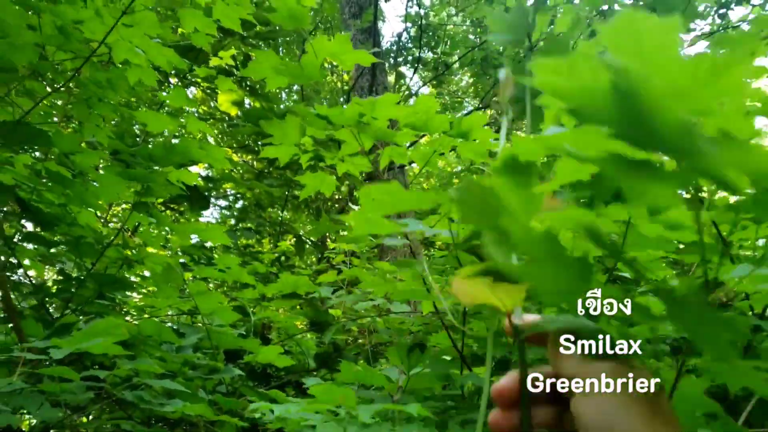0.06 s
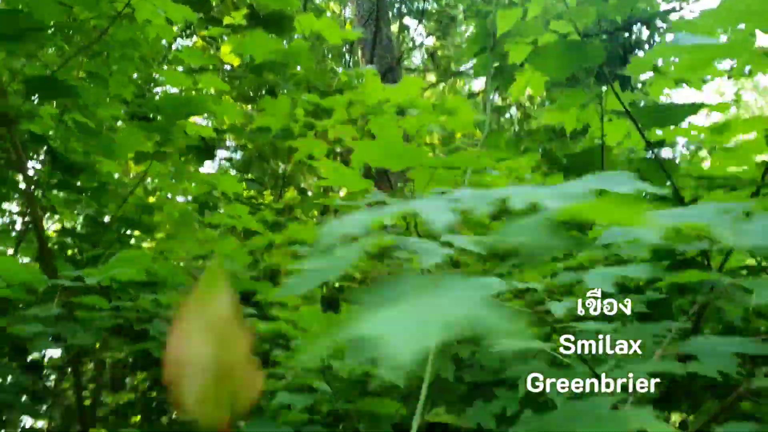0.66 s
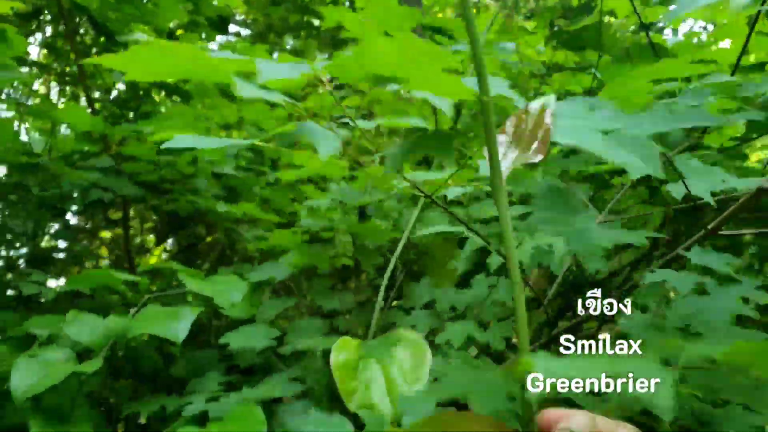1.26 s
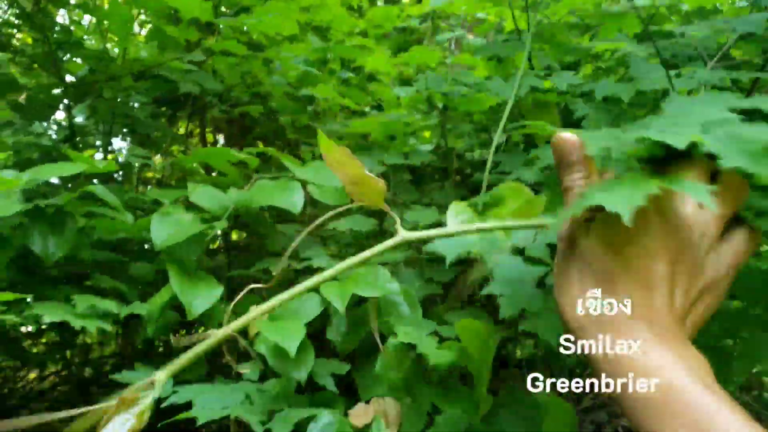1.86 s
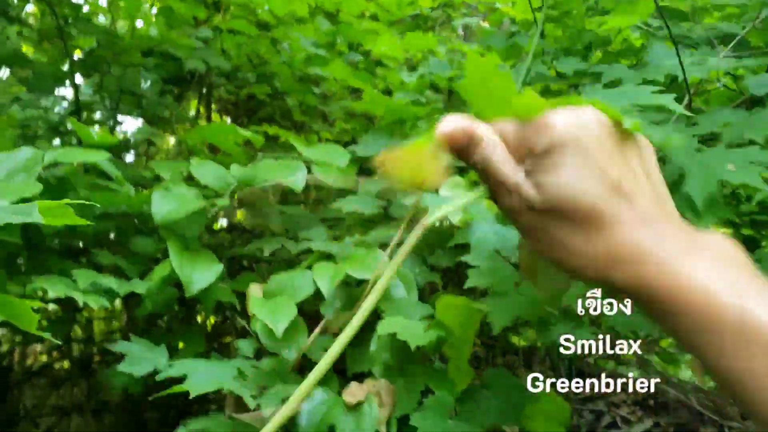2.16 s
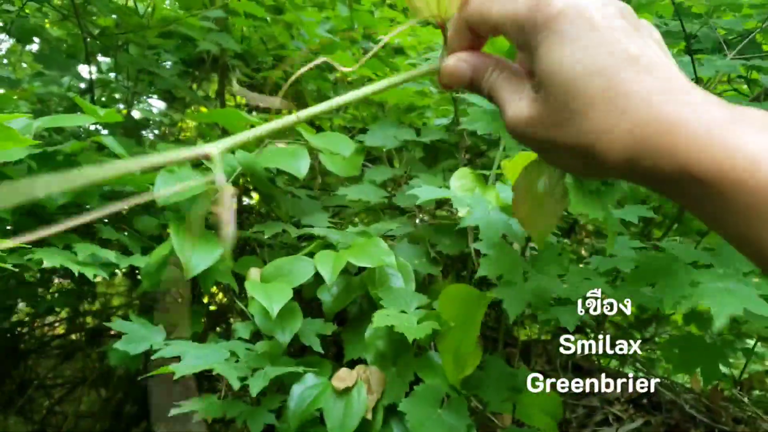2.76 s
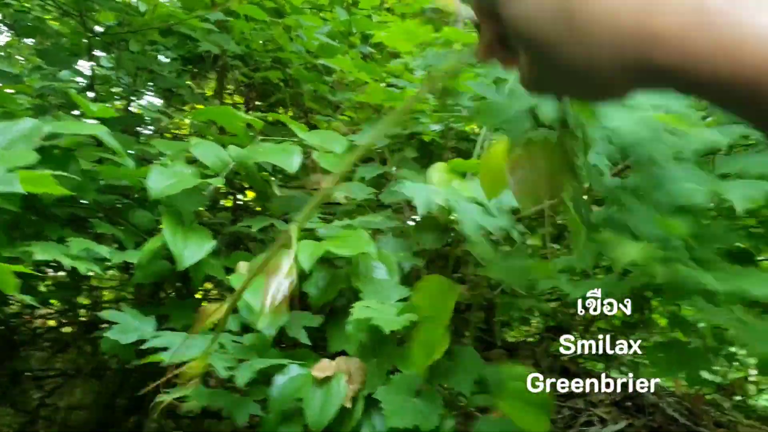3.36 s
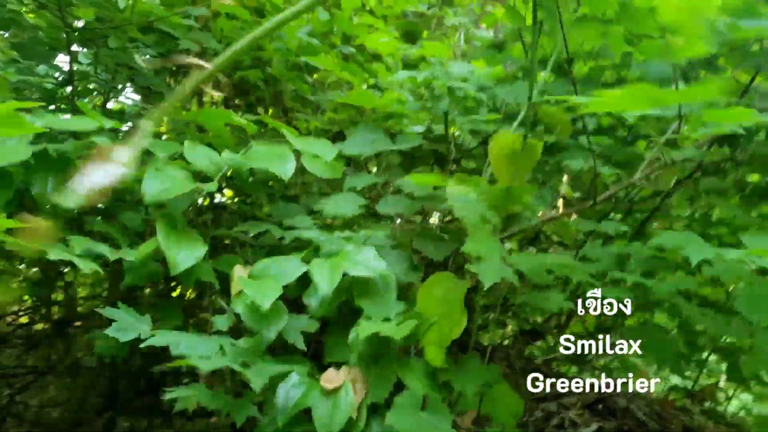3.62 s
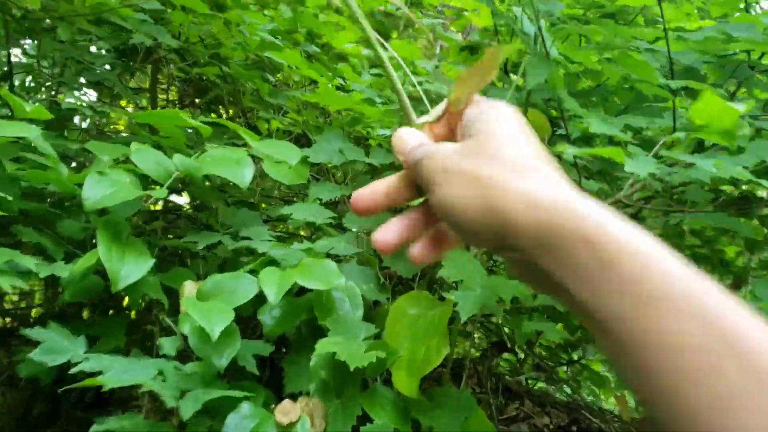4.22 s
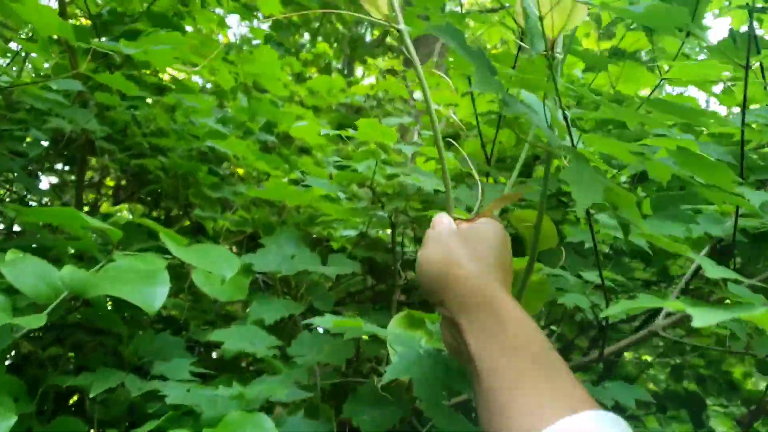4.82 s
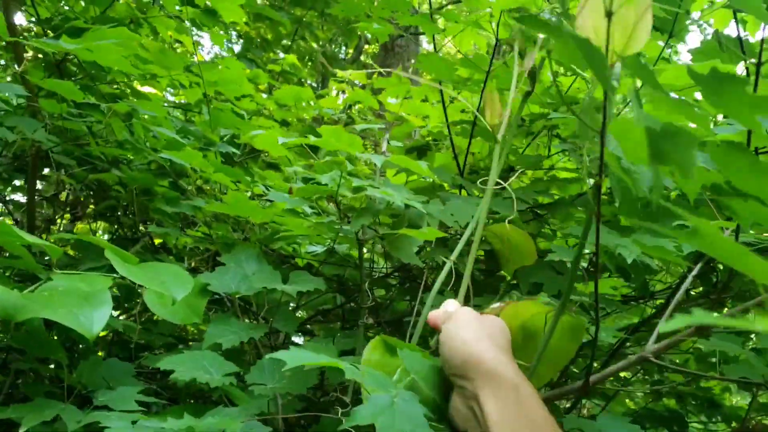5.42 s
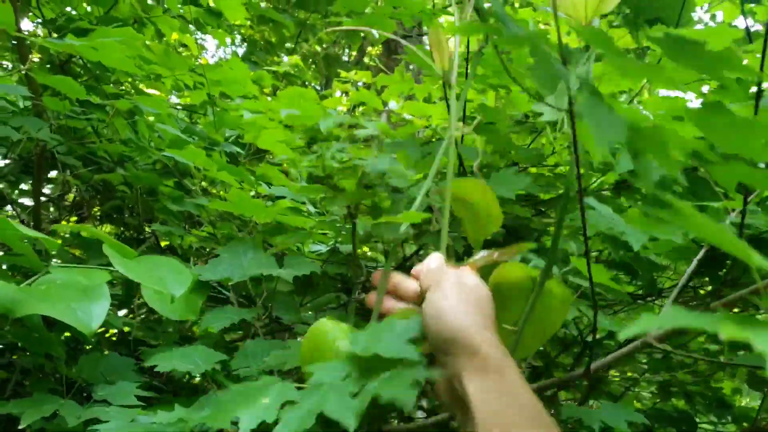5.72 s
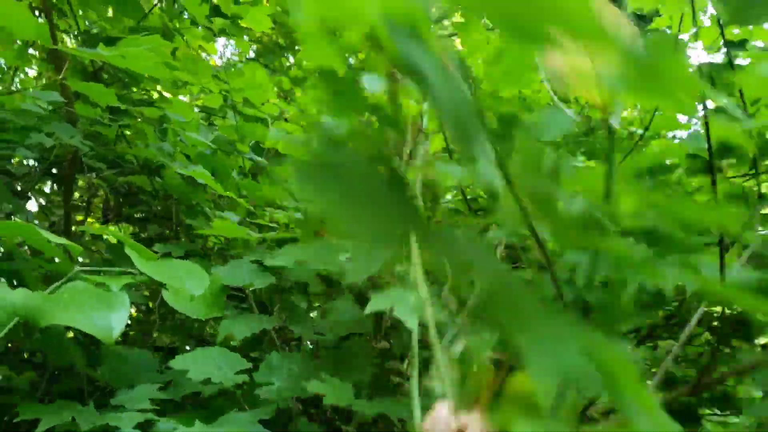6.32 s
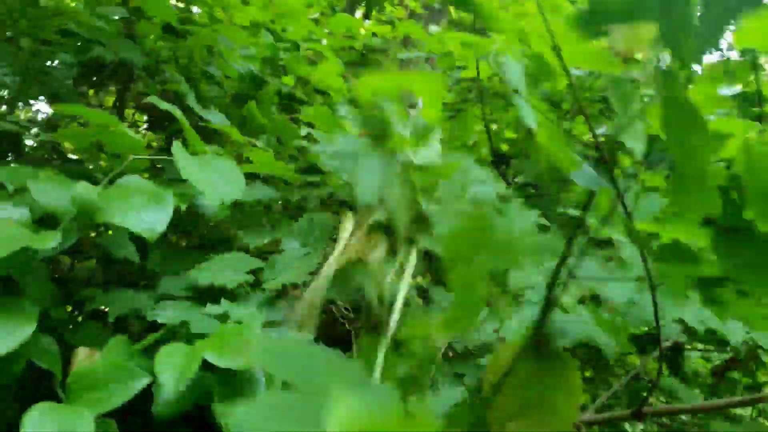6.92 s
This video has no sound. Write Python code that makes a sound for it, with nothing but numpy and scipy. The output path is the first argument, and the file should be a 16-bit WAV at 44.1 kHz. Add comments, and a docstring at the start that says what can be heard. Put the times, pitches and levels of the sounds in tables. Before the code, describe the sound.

Leaves rustle and brush a hand-held microphone as a vine is tugged through forest undergrowth, with a few sharp stem clicks. The rustling eases while a hawk-like bird repeats a hoarse, falling scream farther off, six times in all, with a short woodland echo. Near the end comes a loud flurry of leaf swipes, snaps and taps, over faint outdoor air and an uneven low rumble.

```python
"""A hawk-like bird, a little left of centre in leafy woodland, ends one call and screams six more "kee-aah"s:
each whistle scoops up, breaks to a lower register and trails off among the far trunks.
Close to the microphone a hand pulls a vine through the undergrowth: leaves rustle, stems snap,
and foliage swipes and taps the hand-held camera. Under it all lie soft air and a low handling rumble."""
import sys
import numpy as np
from scipy import signal
from scipy.fft import rfft, irfft, next_fast_len
from scipy.io import wavfile

SR = 44100
rng = np.random.default_rng(int(sys.argv[2]) if len(sys.argv) > 2 else 0)


def dump(signal):
    """Clip the signal to [-1, 1] and save it as 16-bit WAV at the path in sys.argv[1]."""
    limited = np.clip(np.atleast_2d(signal).T, -1, 1)
    pcm = np.round(limited * 32767).astype(np.int16)
    wavfile.write(sys.argv[1], SR, pcm)


N = 312228

# Likeness of the two microphone channels. Each row: frequency in Hz, correlation.
CHANNEL_LIKENESS = [(60, 1), (130, 0.95), (290, 0.75), (640, 0.54), (1400, 0.38), (3100, 0.16),
                    (6800, 0.034), (15000, .05)]
# Balance of the microphone ports. Each row: frequency in Hz, left minus right in dB.
PORT_BALANCE = [(900, -3), (2400, 3.5), (4400, -6), (8000, 2), (10500, -7.5), (13000, -15)]
# Reverberation from the far trunks. Each row: frequency in Hz, seconds to fall by 60 dB.
FOREST_T60 = [(500, 0.32), (1300, 0.82), (2400, 1.24), (5000, 0.2)]
# Course of the handling rumble. Each row: time in seconds, level in dB.
RUMBLE_LEVELS = [(0.0, -46), (0.39, -42.5), (0.71, -47.5), (0.75, -40.5), (1.14, -65.5), (2.34, -57.5),
                 (2.42, -60), (3.04, -54.5), (3.06, -57), (3.77, -46.5), (3.98, -59), (4.06, -49.5),
                 (4.2, -53), (4.43, -48.5), (6.62, -47.5), (6.76, -40), (7.02, -55.5), (7.08, -47)]

# The colour of each noise. Each row: frequency in Hz, relative spectral density in dB.
RUMBLE_SPECTRUM = [(20, -24), (35, -16), (50, -4.5), (68, 1), (85, -5), (105, -9.5), (170, -17.5),
                   (270, -19.5), (400, -33), (800, -74)]
AIR_SPECTRUM = [(25, -36), (100, 6.5), (350, 1.5), (600, -0.5), (1200, -1.5), (2400, -3), (4000, -3.5),
                (9000, -21)]  # also colours the dull rubbing of leaves
HISS_SPECTRUM = [(3000, -22.5), (7000, -14.5), (8200, -24), (9500, -3.5), (10800, 1), (11800, -0.5),
                 (13000, -9), (15500, -12)]
CRINKLE_SPECTRUM = [(500, -10.5), (1300, -7.5), (2100, 1.5), (3100, 6.5), (3500, -5.5), (3900, -3.5),
                    (4600, 2.5), (6000, -4.5), (7300, -2.5), (8200, -30), (12000, -20)]
SWISH_SPECTRUM = [(600, -15.5), (1300, -17), (1800, -6.5), (2300, -0.5), (3100, -2), (3600, -8),
                  (4600, -6.5), (7000, -12), (9000, -27)]
SWIPE_SPECTRUM = [(25, -39), (100, -5.5), (400, -1), (650, -4), (1000, -2), (2500, 1.5), (3800, -1),
                  (7000, -6.5), (8200, -11), (9500, -1), (11000, 2.5), (13000, -8.5), (15500, -12)]
KNOCK_SPECTRUM = [(25, -44), (100, -7.5), (600, -10), (1200, -4), (2000, -2.5), (2900, 0), (4200, -9.5),
                  (5200, -11.5), (6500, -49), (12000, -30)]
TICK_SPECTRUM = [(25, -64), (1500, -24), (4000, -4.5), (7000, -1.5), (8200, -8.5), (10800, 9.5),
                 (13000, -2.5), (15500, -6)]

# How hard the hand stirs the foliage. Each row: time in seconds, relative level in dB.
STIR_LEVELS = [(0.0, -56), (0.2, -58), (0.45, -44.5), (0.77, -49.5), (0.87, -58), (1.01, -62.5),
               (1.52, -69.5), (1.75, -65), (2.03, -62.5), (2.33, -63.5), (2.48, -78), (2.62, -65.5),
               (2.84, -73), (3.17, -83), (3.49, -78), (3.61, -57.5), (3.65, -56), (3.88, -64),
               (4.08, -66.5), (4.38, -56), (4.93, -60), (5.23, -64.5), (5.4, -59.5), (5.66, -69.5),
               (5.76, -60), (6.37, -50), (6.51, -42.5), (6.78, -43), (7.08, -38)]
# Where the leaf hiss sits. Each row: time in seconds, left minus right in dB before a 5 dB shift left.
HISS_SIDES = [(1.1, 0), (2.03, -7), (3.5, 0), (3.85, -7), (4.61, 3), (6.05, -4.5), (7.08, 2.5)]
# Single leaves brushing the hand. Each row: centre and half length in seconds, hiss and swish in dB.
LEAF_BRUSHES = [(0.199, .045, -46, -57), (2.43, 0.12, -57, -61.5), (3.544, .057, -47.5, -48),
                (4.113, 0.055, -64, -58.5), (5.593, 0.025, -48, -64), (5.646, 0.019, -53, -71),
                (5.79, 0.025, -54, -69), (6.014, 0.099, -88, -53)]
# Leaves sliding over the camera. Each row: start and length in seconds, level in dB, fade in dB.
LEAF_SWIPES = [(0.769, 0.023, -30.5, 2.5), (0.796, 0.15, -45, -2.5), (1.263, 0.047, -50.5, 13.5),
               (3.449, 0.041, -47, 6.5), (5.234, 0.022, -48.5, 5.5), (6.531, 0.045, -36.5, 9),
               (6.661, 0.11, -27.5, 1.5), (6.889, 0.031, -38, -2.5), (7.007, 0.086, -39, 4),
               (7.05, .046, -35.5, -2)]
# Stems snapping and tapping the camera. Each row: start in seconds, relative knock and tick in dB.
STEM_TAPS = [(.394, -38, -35.5), (.452, -39, -27), (.766, -28, -28.5), (.947, -31.5, -47), (.953, -40, -31),
             (1.298, -46, -52), (1.416, -54, -62), (2.366, -77, -44.5), (3.443, -36.5, -25),
             (4.3, -48.5, -46), (5.013, -48, -38.5), (5.247, -48, -41), (6.35, -18.5, -36.5),
             (6.381, -23.5, -47), (6.4, -19.5, -36), (6.408, -25.5, -39), (6.429, -27.5, -31.5),
             (6.463, -26, -38), (6.51, -29, -42), (6.535, -22.5, -48), (6.654, -21, -22),
             (6.694, -20.5, -23), (6.74, -18, -31), (6.837, -55, -26), (6.87, -45, -24),
             (6.892, -28.5, -37), (6.902, -23.5, -61), (6.997, -26, -22), (7.055, -29, -21)]
# The vine flicking the left microphone port. Each row: start in seconds, relative knock and tick in dB.
VINE_FLICKS = [(.968, -24, -21), (.985, -36, -23.5), (.992, -22.5, -28.5), (1.042, -49, -32),
               (5.184, -34, -42.5)]

# The falling end of an earlier call and its short echoes. Each row: start and length in seconds,
# first and last pitch in Hz, level in dB.
CALL_TAIL = [(0, 0.032, 1868, 1753, -51), (0.034, 0.03, 1990, 2330, -51), (.094, .02, 2230, 2240, -57)]
# Brief downward cracks of the high register. Each row: start and length in seconds, drop in Hz.
VOICE_CRACKS = [(1.876, .018, 540), (2.055, .08, 450), (2.637, .098, 350)]
# The screams. Each row: start, length, high hold and downward glide in seconds; scoop depth, top pitch
# and end pitch before the droop in Hz; opening accent, high level, low level and fade after the hold
# in dB; fundamental against the whistle while high in dB; hoarseness, which scales the pitch scatter.
BIRD_SCREAMS = [(0.304, 0.47, 0.051, .026, 301, 2934, 2150, 1.5, -41, -43, 0.5, -18, 0.0052),
                (1.167, .4, 0.052, 0.059, 310, 2993, 2157, 14, -51, -45, 9, -6.5, 0.0087),
                (1.846, 0.4, 0.32, 0.0044, 604, 2960, 2207, 5, -53, -49.5, 2, -4, 0.016),
                (2.59, .618, .358, 0.0119, 299, 3050, 2139, 9.5, -52.5, -53, -1, -14, 0.01),
                (3.489, .46, .047, 0.055, 458, 3145, 2227, 10, -48.5, -38, 18, -19, 0.0052),
                (4.33, 0.57, 0.19, 0.0154, 497, 2994, 2118, 6, -49.5, -44.5, 11, -15, 0.006)]


def amp(db):
    """Decibels to gain."""
    return 10 ** (np.asarray(db) / 20)


def unit(x):
    """Scale to rms 1."""
    return x / np.sqrt(np.mean(x ** 2) + 1e-20)


def along(points, hz):
    """(Hz, value) points read on a log axis."""
    knots_hz, values = np.transpose(points)
    return np.interp(np.log(hz + 1), np.log(knots_hz + 1), values)


def curve(points):
    """(Seconds, value) points read at every sample."""
    return np.interp(np.arange(N) / SR, *np.transpose(points))


def wobble(rate, size=N):
    """A smooth random curve, rate knots a second."""
    knots = rng.standard_normal(int(N * rate / SR) + 4)
    fine = signal.resample_poly(knots, 8, 1)
    return np.interp(np.arange(size) * 8 * rate / SR, np.arange(len(fine)), fine)


def gate(t, length, edge):
    """1 from time 0 to length, with ramps of edge seconds centred on both ends."""
    return np.clip(np.minimum(t, length - t) / edge + .5, 0, 1)


def filtered(x, response):
    """Filter x by a gain given as a function of frequency."""
    size = next_fast_len(x.shape[-1] + 8192)
    gain = response(np.fft.rfftfreq(size, 1 / SR))
    return irfft(rfft(x, size) * gain, size)[..., :x.shape[-1]]


def ringing(spectrum, size=1024):
    """The short minimum-phase ring that has this spectrum."""
    cepstrum = irfft(np.log(amp(along(spectrum, np.fft.rfftfreq(size, 1 / SR)))))
    cepstrum[1:size // 2] *= 2
    cepstrum[size // 2 + 1:] = 0
    return irfft(np.exp(rfft(cepstrum)))


def panned(side_db):
    """Left and right gains of constant power; positive is to the left."""
    gains = amp([side_db / 2, -side_db / 2]).reshape(2, -1)
    return gains / np.sqrt(np.mean(gains ** 2, axis=0))


def add(track, start_s, sound):
    """Mix a sound into the track at start_s."""
    room = track[:, max(round(start_s * SR), 0):][:, :sound.shape[1]]
    room += sound[:, :room.shape[1]]


def spread(pair, spectrum):
    """Colour two noises into stereo: alike in the bass, unrelated in the treble."""
    def mid_side_gains(hz):
        angle = np.arccos(np.clip(along(CHANNEL_LIKENESS, hz), -1, 1)) / 2
        return amp(along(spectrum, hz)) * [np.cos(angle), np.sin(angle)]
    mid, side = filtered(pair, mid_side_gains)
    return np.array([mid + side, mid - side]) / np.std(mid)


def woodland_air(level_db=-67.5):
    """Soft, steady air all round the microphone."""
    return amp(level_db) * spread(rng.standard_normal((2, N)), AIR_SPECTRUM)


def handling_rumble(hum_hz=139, hum_db=-15, swell_db=2.3):
    """A low, unsteady rumble from handling the camera, with a faint wavering hum."""
    hum_gain = amp(hum_db + 4.1 * wobble(9.9))
    hum = hum_gain * np.sin(2 * np.pi * np.cumsum(hum_hz + 2 * wobble(4)) / SR)
    level = amp(curve(RUMBLE_LEVELS) + swell_db * wobble(8.1))
    return level * (spread(rng.standard_normal((2, N)), RUMBLE_SPECTRUM) + hum)


def friction(spectrum, grain_db, clump_db):
    """Tiny slips of uneven size, bunched in clumps."""
    sizes = amp(grain_db * wobble(1800) + clump_db * (wobble(70) + wobble(18)))
    return spread(sizes * rng.standard_normal((2, N)), spectrum)


def crackle(per_second):
    """Sparse ticks of leaf edges and thorns catching, most of them tiny."""
    catches = (rng.random(N) < per_second / SR) * rng.exponential(size=(2, N))
    return signal.oaconvolve(catches, ringing(TICK_SPECTRUM)[None], axes=1)[:, :N]


def leaves(hiss_db=2.5, crinkle_db=-1.5, rub_db=-11, hard_stir_db=-46):
    """Leaves stirred close by hiss, crinkle and, pushed hard, rub dully; single blades swish past."""
    t = np.arange(N) / SR
    stir_db = curve(STIR_LEVELS) + 1.77 * wobble(10)
    hiss_gain, swish_gain = amp(stir_db + hiss_db), np.zeros(N)
    for centre, half_length, brush_hiss_db, swish_db in LEAF_BRUSHES:
        passing = np.abs(t - centre) < 2 * half_length
        swell = np.exp(-((t[passing] - centre) / half_length) ** 2)
        hiss_gain[passing] += amp(brush_hiss_db) * swell
        swish_gain[passing] += amp(swish_db) * swell
    # slope is dB of the layer per dB of stirring: the rubbing swells fastest
    stirred = lambda slope: amp(hard_stir_db + slope * (stir_db - hard_stir_db))
    hiss = hiss_gain * friction(HISS_SPECTRUM, grain_db=2, clump_db=1.38)
    crinkle = friction(CRINKLE_SPECTRUM, grain_db=2, clump_db=2) + amp(9) * crackle(per_second=12)
    crinkle *= amp(crinkle_db) * stirred(slope=1.04)
    rub = amp(rub_db) * stirred(slope=1.41) * friction(AIR_SPECTRUM, grain_db=-2, clump_db=3)
    swish = swish_gain * friction(SWISH_SPECTRUM, grain_db=3, clump_db=1.5)
    return hiss * panned(curve(HISS_SIDES) + 5) + crinkle * panned(-1) + rub + swish


def swipes(release_s=0.039):
    """A leaf slaps onto the camera, drags across it and slips off."""
    t, pressure = np.arange(SR // 2) / SR, np.zeros((1, N))
    for start, length, db, fade_db in LEAF_SWIPES:
        drag = amp(db - fade_db * np.clip(t / length, 0, 1))
        slip_off = np.exp(-np.maximum(t - length, 0) / release_s)
        add(pressure, start, (drag * slip_off)[None])
    return pressure * friction(SWIPE_SPECTRUM, grain_db=2, clump_db=0.9) * panned(0.13)


def contact(spectrum, t60, likeness, rebound, tail, size=2048):
    """A sharp release, a rebound milliseconds later and a dying chatter, ringing in the given colour."""
    t = np.arange(size) / SR - .002
    blow = lambda age, life: (age > 0) * amp(-60 * np.abs(age) / life)
    rebound_s = rng.uniform(0.0017, .004)
    force = blow(t, t60) + rebound * blow(t - rebound_s, t60) + tail * blow(t, 0.088)
    shared, separate = rng.standard_normal(size), rng.standard_normal((2, size))
    chatter = force * (np.sqrt(likeness) * shared + np.sqrt(1 - likeness) * separate)
    return unit(signal.fftconvolve(chatter, ringing(spectrum)[None], axes=1)[:, :size])


def taps(stem_side_db=2, flick_side_db=20):
    """Stems hit the casing with a dull knock and a bright tick, short and dry when right on a port."""
    track = np.zeros((2, N))
    for hits, side_db in (STEM_TAPS, stem_side_db), (VINE_FLICKS, flick_side_db):
        ring = 1 / (0.5 + (side_db / 12) ** 2)
        for start, knock_db, tick_db in hits:
            knock = contact(KNOCK_SPECTRUM, t60=0.0069 + 0.002 * ring, likeness=0.82,
                            rebound=0.43 * ring, tail=0.2 * ring)
            tick = contact(TICK_SPECTRUM, t60=0.0023 + 0.0033 * ring, likeness=0.41,
                           rebound=0.14, tail=0.094 * ring)
            add(track, start, (amp(knock_db - 12.5) * knock + amp(tick_db - 10) * tick) * panned(side_db))
    return track


def forest(call, near_db=-10, far_db=-8, near_t60=0.12):
    """Nearby foliage scatters the call at once; far trunks return a long tail."""
    hz, t, noise = signal.stft(rng.standard_normal((2, SR)), SR, nperseg=256)
    decay = amp(-60 * t / along(FOREST_T60, hz)[:, None])
    far = signal.istft(noise * decay, SR, nperseg=256)[1][:, :SR]
    near = rng.standard_normal((2, SR)) * amp(-60 * np.arange(SR) / SR / near_t60)
    echoes = (amp(near_db) * unit(near) + amp(far_db) * unit(far)) / np.sqrt(SR)
    return signal.fftconvolve(call[None], echoes, axes=1)[:, :N]


def level_dip(start_s=.99, fall_s=.03, depth_db=13.5, recover_db_per_s=4):
    """The level drops quickly and creeps back up."""
    t = np.arange(N) / SR - start_s
    return amp(-np.clip(t / fall_s, 0, 1) * np.maximum(depth_db - recover_db_per_s * t, 0))


def voice(hz, rasp, high_fundamental_db, low_fundamental_db=-16.5, jitter=0.0036, shimmer_db=2.5,
          strain_hz=2680, beak_hz=4450, beak_width_hz=350):
    """A whistle at hz, the second harmonic of the bird's voice, over a weaker fundamental."""
    waver = lambda rate: wobble(rate, size=len(hz))
    # the voice turns hoarse when pushed high
    strain = 1 / (1 + np.exp((strain_hz - hz) / 80))
    rough_hz = hz * (1 + jitter * waver(69.4) + rasp * (strain + 0.39) * waver(450))
    phase = np.pi * np.cumsum(rough_hz) / SR  # of the fundamental
    # under strain alternate cycles differ, which adds a tone halfway between the harmonics
    split = strain * amp(-18) * rasp / 0.0095 * np.sin(1.5 * phase)
    # higher harmonics sound only as they pass the resonance of the open beak
    harmonics = np.array([[3], [4]])
    resonance = np.exp(-((harmonics * hz / 2 - beak_hz) / beak_width_hz) ** 2)
    upper = amp(-21) * (strain + 0.65) * np.sum(resonance * np.sin(harmonics * phase), axis=0)
    fundamental_db = strain * high_fundamental_db + (1 - strain) * low_fundamental_db + 5 * waver(14.73)
    fundamental = amp(fundamental_db) * np.sin(phase)
    shimmer = amp(shimmer_db * waver(54.36))
    return np.sqrt(2) * shimmer * (np.sin(2 * phase) + upper + split + fundamental)


def call_tail(edge_s=.012):
    """The falling end of an earlier call and its short echoes, each a hoarse, straight slide in pitch."""
    track = np.zeros((1, N))
    for start, length, from_hz, to_hz, db in CALL_TAIL:
        t = np.arange(-edge_s / 2, length + edge_s / 2, 1 / SR)
        whistle = voice(np.linspace(from_hz, to_hz, len(t)), rasp=.025, high_fundamental_db=-20)
        add(track, start + t[0], (amp(db) * gate(t, length, edge_s) * whistle)[None])
    return track[0]


def screams(scoop_s=0.03294, accent_s=.045, sag_hz_per_s=850, droop_hz=94, droop_s=.015, edge_s=.012):
    """Each scream scoops up, holds and breaks to the low register; its pitch sags, then lets go."""
    track = np.zeros((1, N))
    for (start, length, hold, glide, scoop_hz, top_hz, end_hz,
         accent_db, high_db, low_db, fade_db, fundamental_db, rasp) in BIRD_SCREAMS:
        t = np.arange(-edge_s / 2, length + edge_s / 2, 1 / SR)
        high_hz = top_hz - sag_hz_per_s * (t - scoop_s) - scoop_hz * np.maximum(1 - t / scoop_s, 0)
        high_hz -= sum(drop_hz * gate(start + t - at, span, edge_s) for at, span, drop_hz in VOICE_CRACKS)
        low_hz = end_hz + sag_hz_per_s * (length - t) - droop_hz * np.exp((t - length) / droop_s)
        since_break = np.maximum(t - hold, 0)
        register = lambda high, low: low + (high - low) * np.exp(-since_break / glide)
        db = register(high_db, low_db) - fade_db * since_break / since_break[-1]
        db += accent_db * np.exp(-t / accent_s)
        whistle = voice(register(high_hz, low_hz), rasp, fundamental_db)
        add(track, start + t[0], (amp(db) * gate(t, length, edge_s) * whistle)[None])
    return track[0]


def scene(trees_db=2):
    """Foliage right at the microphone; farther off, the bird and the air dip in level together."""
    bird = screams() + call_tail()
    air = woodland_air()
    echoes = amp(trees_db) * forest(bird)
    distant = bird * panned(1.9) + echoes * panned(0.78) + air
    return level_dip() * distant + leaves() + swipes() + taps() + handling_rumble()


def record(dry, top_hz=15700):
    """The camera's stereo microphone: the right port is the brighter, and nothing passes above top_hz."""
    return filtered(dry, lambda hz: panned(along(PORT_BALANCE, hz)) * (hz < top_hz))


dry = scene()
out = record(dry)
dump(out)
```